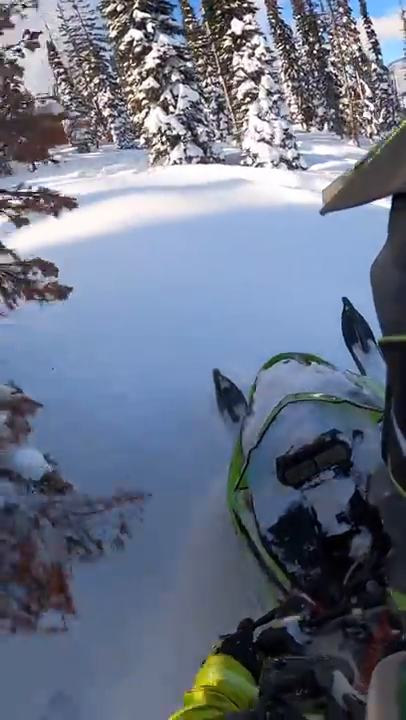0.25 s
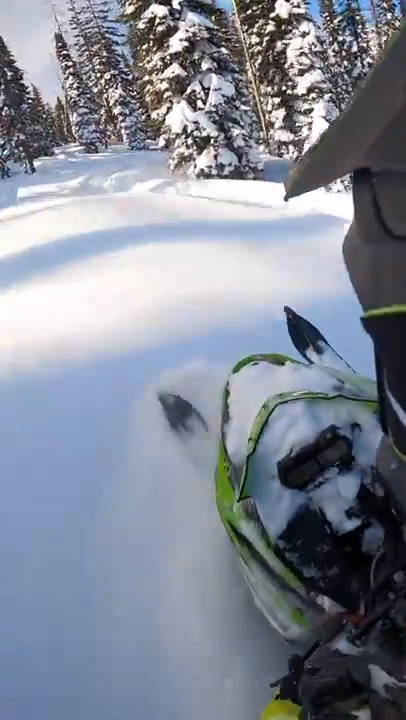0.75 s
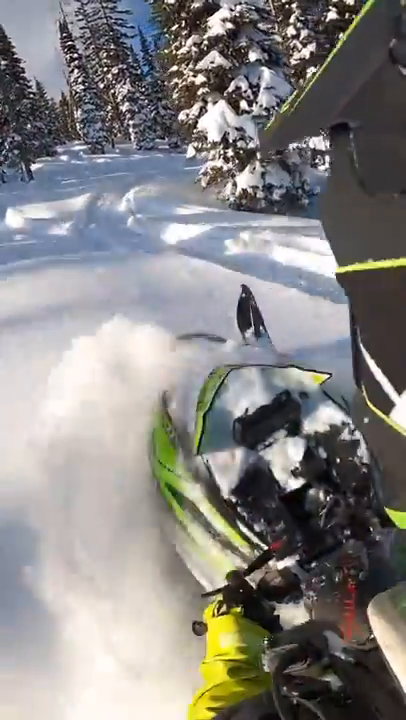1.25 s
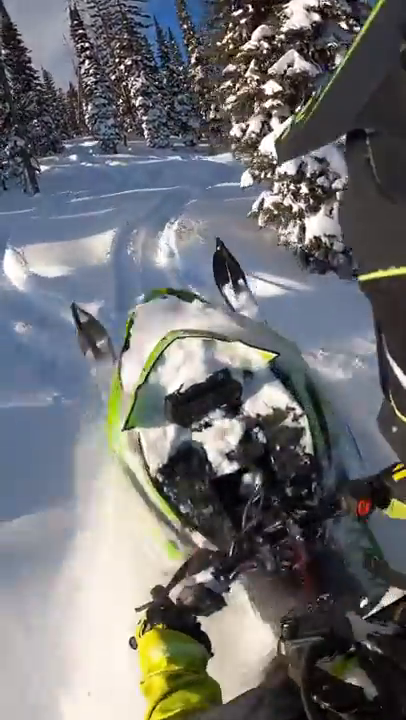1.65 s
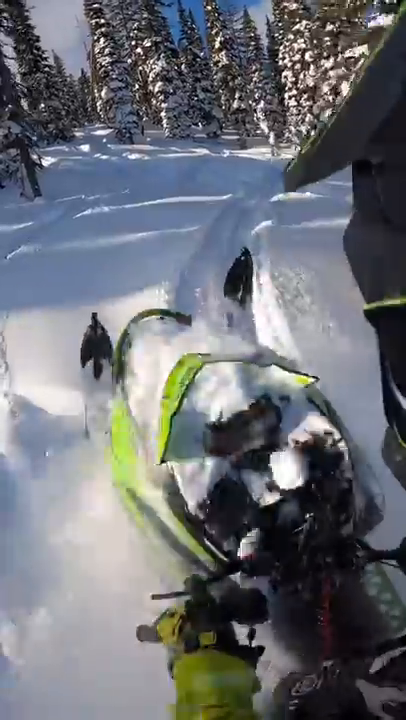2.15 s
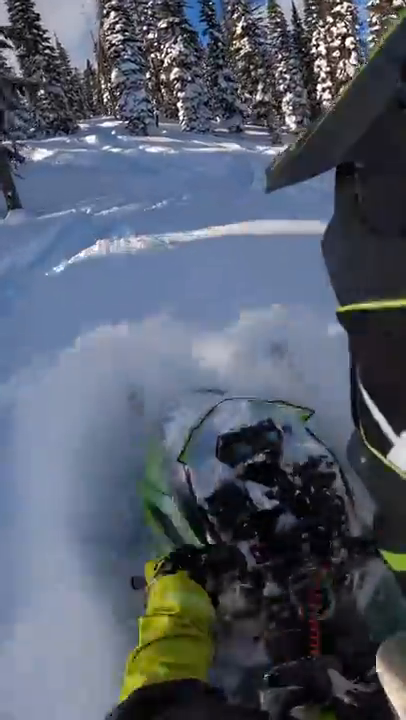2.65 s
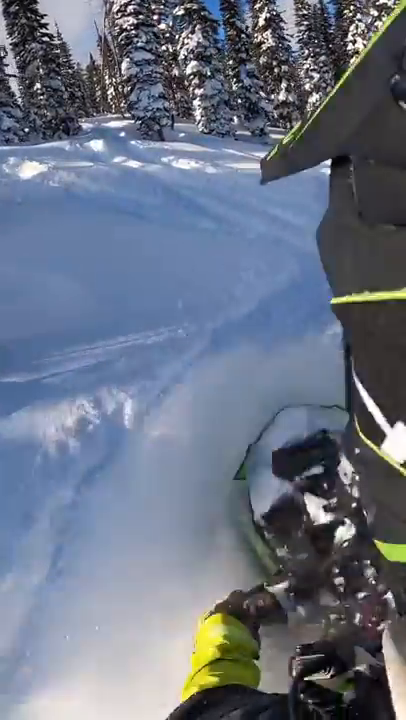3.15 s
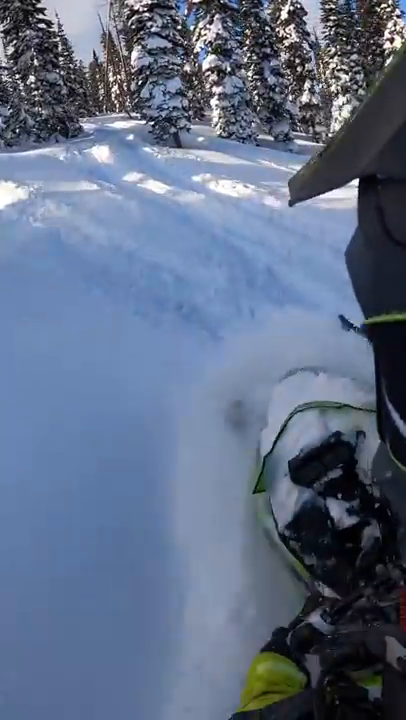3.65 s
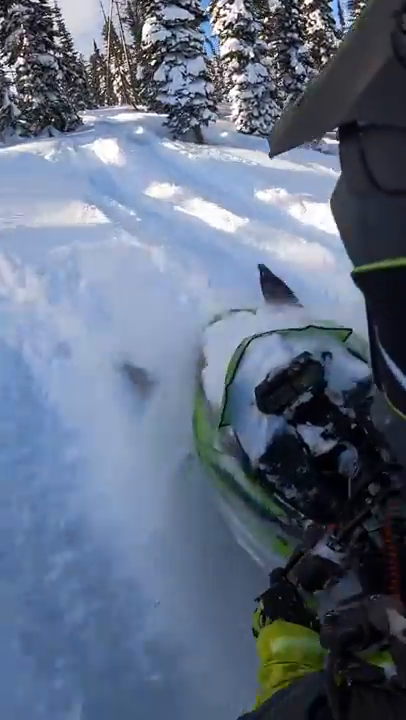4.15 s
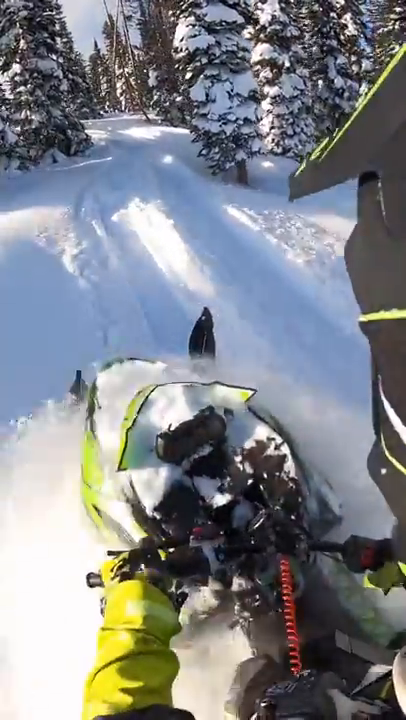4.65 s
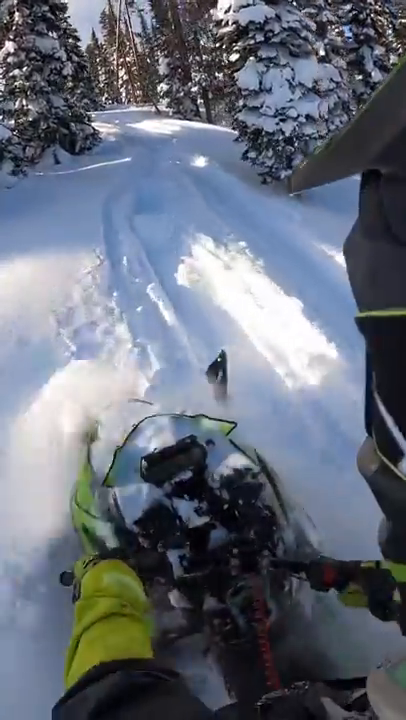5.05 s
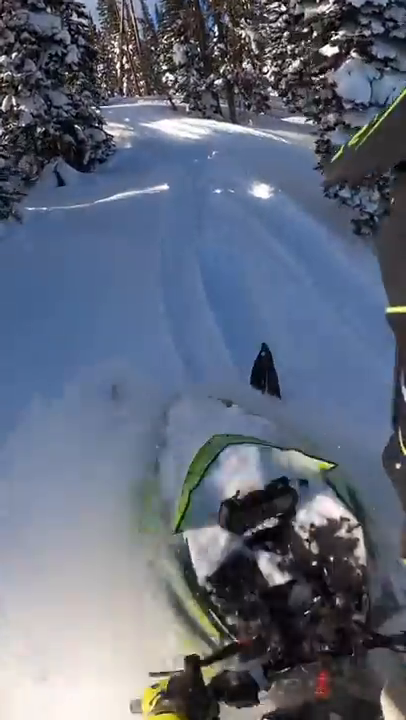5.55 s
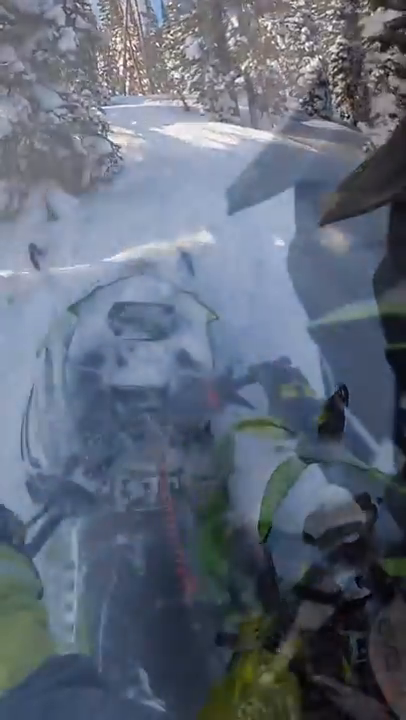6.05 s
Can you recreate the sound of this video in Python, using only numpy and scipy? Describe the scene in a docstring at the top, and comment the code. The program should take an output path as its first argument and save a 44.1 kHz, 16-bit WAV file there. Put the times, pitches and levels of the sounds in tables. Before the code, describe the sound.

Heard from the rider's body, a two-stroke snowmobile surges in quick throttle bursts, its hollow boom and raspy buzz rising and sagging. The track hums unsteadily while wind rumbles and powder churns and sprays. Soft snow waves and dull clods hit mid-ride. The sound cuts abruptly near the end; after a brief silence a soft low engine rattle fades in with tiny ticks.

```python
"""A two-stroke twin snowmobile carves through deep powder, heard from the rider's body.
From the start bursts of throttle make the tuned pipe boom and the firings rasp, as orders of the firing rate
with noisy puffs. The track lugs hum as a wavering tone; wind, churn and spray are shaped noise throughout.
Waves of powder and clods arrive as noise swells and short hits. The ride cuts out abruptly, then after a
silence the engine fades in running slowly: a soft tone, a dull rattle, light ticks and puffs of powder."""
import sys
import numpy as np
from scipy import signal
from scipy.fft import rfft, irfft, next_fast_len
from scipy.io import wavfile
from scipy.ndimage import uniform_filter1d, minimum_filter1d, map_coordinates

SR = 44100
rng = np.random.default_rng(int(sys.argv[2]) if len(sys.argv) > 2 else 0)


def put_to_file(sound):
    """Save the sound as 16-bit audio at rate SR, in the file named by the first command-line argument."""
    columns = np.atleast_2d(sound).T  # one column per channel
    safe = np.clip(columns, -1, 1)
    whole_steps = np.round(safe * 32767)
    wavfile.write(sys.argv[1], SR, whole_steps.astype(np.int16))


N = 277823
T = np.arange(N) / SR


def amp(db):
    """Decibels to gain."""
    return 10 ** (np.asarray(db) / 20)


def unit(x):
    """Scale to rms 1."""
    return x / np.sqrt(np.mean(x ** 2) + 1e-20)


def curves(rows):
    """One value per sample for each column after the time."""
    time_s, *columns = np.transpose(rows)
    return [np.interp(T, time_s, column) for column in columns]


def wobble(rate):
    """A smooth random curve with rate knots a second."""
    knots = rng.standard_normal(int(N * rate / SR) + 4)
    coarse_s = T[::16]
    return np.interp(T, coarse_s, map_coordinates(knots, [coarse_s * rate]))


def bump(centre_s, half_length_s):
    """A soft rise and fall of height 1, down to 1/e one half length from its centre."""
    return np.exp(-((T - centre_s) / half_length_s) ** 2)


def glide(start_s, end_s, skew):
    """An S-shaped move from 0 to 1 between two times; a skew under 1 moves sooner."""
    progress = np.clip((T - start_s) / (end_s - start_s), 0, 1)
    return np.sin(np.pi / 2 * progress ** skew) ** 2


def filtered(x, response):
    """Multiply the spectrum of x by a function of frequency in Hz."""
    size = next_fast_len(N + SR // 2)
    hz = np.fft.rfftfreq(size, 1 / SR)
    return irfft(rfft(x, size) * response(hz), size)[:N]


def coloured(x, spectrum):
    """Equalise x by (pitch_hz, level_db) points on a log frequency axis, then scale to rms 1."""
    pitch_hz, level_db = np.transpose(spectrum)

    def response(hz):
        return amp(np.interp(np.log(hz + 1), np.log(pitch_hz), level_db, left=-80, right=-100))
    return unit(filtered(x, response))


def noise(patchy_db):
    """White noise with patches of random gain in time and frequency."""
    grains = signal.stft(rng.standard_normal(N), nperseg=512)[2]
    patches = uniform_filter1d(rng.standard_normal(grains.shape), size=9, axis=0)
    patches = unit(uniform_filter1d(patches, size=7, axis=1))
    return signal.istft(grains * amp(patchy_db * patches), nperseg=512)[1][:N]


def turning(hz):
    """Phase in radians of something that repeats hz times a second."""
    return 2 * np.pi * np.cumsum(hz) / SR


def tone(phase):
    """A sine of rms 1 with a random start."""
    return np.sqrt(2) * np.cos(phase + rng.uniform(0, 2 * np.pi))


def per_firing(phase):
    """A new random value for each firing, smoothly joined."""
    return map_coordinates(rng.standard_normal(N // 64), [phase / (2 * np.pi)])


def swells(rows, spectrum):
    """Soft rushes of snow that rise and fall."""
    envelope = sum(amp(level_db) * bump(centre_s, half_length_s) for centre_s, half_length_s, level_db in rows)
    return envelope * coloured(rng.standard_normal(N), spectrum)


def knocks(rows, spectrum, t60):
    """Unpitched noise hits whose envelopes fall by 60 dB in t60 seconds."""
    envelope = sum(amp(level_db - 60 * np.abs(T - start_s) / t60) * (T >= start_s)
                   for start_s, level_db in rows)
    hits = envelope * rng.standard_normal(N)
    return np.std(hits) * coloured(hits, spectrum)


THROTTLE_S, THUMB_LEAD_S = 0.069, 0.013  # time the throttle takes to move; its lead on the revs


def eased(x):
    """Smooth x over the time that the throttle takes to move."""
    return uniform_filter1d(x, size=max(1, int(THROTTLE_S * SR)))


FULL_HZ, LOAD_SPAN_HZ = 275.2, 31.7  # the engine stops pulling over this span below full revs


def headroom(firing_hz):
    """1 while the engine can still speed up, 0 at full revs."""
    return np.clip((FULL_HZ - firing_hz) / LOAD_SPAN_HZ, 0, 1)


# Bursts of throttle: start_s, low_hz and top_hz (firings per second), rise_s and hold_s, in the order
# start_s, low_hz, rise_s, top_hz, hold_s, then boom_db (added to the pipe's level), octave_db,
# octave_loss_db (at full revs), third_db, rasp_open_db, rasp_run_down_db, added_roughness (0-1)
THROTTLE_BURSTS = [(-.2, 239, 0.22, 260.6, 0.041, 0, -21, 7.5, -27.5, -29.5, -31, 0.03),
                   (.246, 233.3, 0.27, 254, 0.055, 1.5, -21, 8, -29.5, -30.5, -34, 0.04),
                   (.755, 223.7, 0.41, 269.7, 0.49, 1.5, -22.5, 15.5, -31, -29, -27, 0.02),
                   (1.824, 212.9, 0.34, 266.5, 0.28, -2.5, -22, 6.5, -34.5, -29, -33.5, .03),
                   (2.717, 185.7, 0.2, 217.1, 0, -5.5, -28.5, 0, -36, -31, -33.5, .08),
                   (3.13, 169.1, 0.19, 208.6, 0.0036, -11, -31, 0, -41, -33.5, -32.5, 0.22),
                   (3.488, 168.3, .213, 204, .033, -1, -24.5, 0, -40, -34.5, -33.5, .08),
                   (3.8, 177.9, 0.4, 258.8, 0.018, -1, -24, 12, -34.5, -30, -30.5, 0),
                   (4.57, 163.6, 0.21, 210.2, 0.004, -1.5, -22.5, 0, -30, -29.5, -26.5, 0.01),
                   (4.972, 173.5, 0.23, 225, 0.021, -0.5, -27, 0, -31.5, -27.5, -27.5, 0.01)]
COAST_S, COAST_HZ = 5.615, 142.2  # the last run-down ends here
CREEP_HZ_PER_S = 9  # the revs still creep up while the throttle is held
RISE_SKEW, FALL_SKEW = .865, .766
LOAD_BUILD_S = 0.11  # the clutch takes up the load over this time


def drive():
    """Firing rate, throttle and load (0-1): each burst winds the engine up, holds it and lets it run down."""
    firing_hz = np.full(N, float(THROTTLE_BURSTS[0][1]))
    is_open, grip = np.zeros(N), np.zeros(N)
    troughs = [row[:2] for row in THROTTLE_BURSTS[1:]] + [(COAST_S, COAST_HZ)]
    for burst, (next_s, next_hz) in zip(THROTTLE_BURSTS, troughs):
        start_s, low_hz, rise_s, top_hz, hold_s = burst[:5]
        shut_s = start_s + rise_s + hold_s
        firing_hz += (top_hz - low_hz) * glide(start_s, start_s + rise_s, RISE_SKEW)
        firing_hz += CREEP_HZ_PER_S * np.clip(T - start_s - rise_s, 0, hold_s)
        firing_hz += (next_hz - firing_hz) * glide(shut_s, next_s, FALL_SKEW)
        is_open += (T >= start_s - THUMB_LEAD_S) & (T < shut_s)
        grip += np.clip((T - start_s) / LOAD_BUILD_S, 0, 1) * (T < shut_s)
    return firing_hz, eased(is_open), eased(grip) * headroom(firing_hz)


def burst_levels():
    """The level columns of the bursts, each kept until the next burst and eased across."""
    start_s, _, _, _, _, *levels = np.transpose(THROTTLE_BURSTS)
    current = np.searchsorted(start_s[1:], T)
    return [eased(level[current]) for level in levels]


WAVER_DB = 5  # swing of each low order per unit of roughness


def exhaust(phase, rough, first_db, second_db, third_db):
    """The tuned pipe booms on the lowest orders, which waver when it runs rough; unlike cylinders add half orders."""
    boom = amp(first_db) * (tone(phase) + amp(-24) * tone(phase / 2) + amp(-19) * tone(1.5 * phase))
    orders = [boom, amp(second_db) * tone(2 * phase), amp(third_db) * tone(3 * phase)]
    wavering = sum(order * amp(WAVER_DB * rough * wobble(25)) for order in orders)
    return wavering * amp(2.0 * rough * per_firing(phase))


# Narrow resonances of the hood and intake: pitch_hz, half_width_hz, gain_db
HOOD_WHINES = [(1075, 20, 3), (1630, 35, 3.5), (2184, 70, 5), (2840, 60, 5)]


def overtones(phase, half_order_db, shimmer_db):
    """A buzzing series of crank orders; fixed reflections under the hood make each swell as its pitch slides."""
    orders = [k for k in range(5, 64) if k != 6]  # the exhaust plays order 6
    buzz = sum(amp(half_order_db * (k % 2) + shimmer_db * wobble(6)) * tone(k * phase / 2) for k in orders)
    # one panel answers clearly, several others weakly: (delay_s, gain)
    echoes = [(.00277, .35)] + [(rng.uniform(.004, .014), .2) for _ in range(6)]

    def hood(hz):
        comb = 1 + sum(gain * np.exp(-2j * np.pi * hz * delay_s) for delay_s, gain in echoes)
        whine_db = sum(gain_db / (1 + ((hz - pitch_hz) / half_width_hz) ** 2)
                       for pitch_hz, half_width_hz, gain_db in HOOD_WHINES)
        return comb * amp(whine_db)
    return filtered(buzz, hood)


HALF_ORDER_DB, HALF_ORDER_ROUGH_DB = -5.5, 3  # the cylinders differ more when the engine runs rough


def firings(phase, rough, buzz_spectrum, puff_spectrum):
    """Each firing buzzes and lets out a puff of turbulent gas; rough is the puffs' share of the power."""
    buzz = overtones(phase, half_order_db=HALF_ORDER_DB + HALF_ORDER_ROUGH_DB * rough, shimmer_db=1.5)
    puffs = noise(patchy_db=3.46) * amp(3.2 * np.cos(phase) + 1.7 * np.cos(phase / 2))
    return np.sqrt(1 - rough) * coloured(buzz, buzz_spectrum) + np.sqrt(rough) * coloured(puffs, puff_spectrum)


# Tone colours of the buzz through the hood, of the exhaust's gas puffs and of the intake:
# pitch_hz, level_db (relative, per Hz)
HOOD_COLOUR = [(250, -15.5), (450, 12), (600, -2), (820, -7), (920, -2.5), (1080, -0.5), (1250, 9.5),
               (1450, -5), (1700, -11), (2500, -31.5), (5000, -47)]
RASP_COLOUR = [(300, -23.5), (550, -0.5), (720, -2.5), (880, -3.5), (1200, 3), (1500, -3.5), (2000, -13),
               (3300, -30), (6000, -49)]
INTAKE_COLOUR = [(1200, -27.5), (1550, 4.5), (1800, 2), (2000, 0), (2200, -2), (2450, -5), (2900, -5.5),
                 (3400, -8), (4200, -11), (5500, -21.5), (8000, -32.5)]


def rasp(phase, rough, rasp_db, snarl_db):
    """The exhaust rasps through the hood and the intake snarls above it, uneven from firing to firing."""
    uneven = amp(2.4 * rough * per_firing(phase))
    body = unit(firings(phase, rough, HOOD_COLOUR, RASP_COLOUR) * uneven)
    snarl = unit(firings(phase, rough, INTAKE_COLOUR, INTAKE_COLOUR) * uneven)
    return amp(rasp_db) * body + amp(snarl_db) * snarl


# Boom of the tuned pipe: firing_hz (firings per second), level_db (before the burst's boom_db and the cuts)
PIPE_BOOM = [(142, -15), (156, -14), (174, -23), (200, -18.5), (230, -14.5), (255, -12), (269, -10),
             (274, -13)]
# Combustion smooths out with the revs: firing_hz (firings per second), roughness (0-1, before additions)
REV_ROUGHNESS = [(165, .5), (220, .2), (270, .11)]
SHUT_ROUGHNESS = .3  # added with the throttle shut
FLUTTER, FLUTTER_PER_S = .035, 70  # swing of crank speed per squared roughness, and its pace
BOG_DB, BOG_S, BOG_LEAD_S = 3, 0.068, .01  # the boom sinks around each opening: depth, half length, lead
BOOM_SHUT_DB, OCTAVE_SHUT_DB, THIRD_SHUT_DB = 1, 9, 6  # losses with the throttle shut
RASP_LOAD_DB = 3  # the rasp gains with load
SNARL_DB, SNARL_OPEN_DB, SNARL_LOAD_DB = -5, 0.5, 2.5  # snarl against rasp; gains with throttle and load


def engine(firing_hz, throttle, load):
    """Revs, throttle and load shape the levels; with the throttle shut it sputters and the crank flutters more."""
    boom_db, octave_db, octave_loss_db, third_db, open_db, run_down_db, added_rough = burst_levels()
    shut = 1 - throttle
    rough = np.interp(firing_hz, *np.transpose(REV_ROUGHNESS)) + SHUT_ROUGHNESS * shut + added_rough
    rough = np.clip(rough, 0, .8)
    phase = turning(firing_hz * (1 + FLUTTER * rough ** 2 * wobble(FLUTTER_PER_S)))
    bog = sum(bump(start_s - BOG_LEAD_S, BOG_S) for start_s, *_ in THROTTLE_BURSTS)
    pipe_db = np.interp(firing_hz, *np.transpose(PIPE_BOOM))
    first_db = boom_db + pipe_db - BOG_DB * bog - BOOM_SHUT_DB * shut
    second_db = octave_db - OCTAVE_SHUT_DB * shut - octave_loss_db * throttle * (1 - headroom(firing_hz))
    rasp_db = open_db * throttle + run_down_db * shut + RASP_LOAD_DB * load
    snarl_db = rasp_db + SNARL_DB + SNARL_OPEN_DB * throttle + SNARL_LOAD_DB * load
    pipe = exhaust(phase, rough, first_db, second_db, third_db - THIRD_SHUT_DB * shut)
    return pipe + rasp(phase, rough, rasp_db, snarl_db)


# Track hum: time_s, lug_hz (lugs per second, before flutter), level_db (of the main tone, before waver)
TRACK_HUM = [(0, 171.8, -30), (.45, 179.5, -26), (.78, 155.1, -25), (1.17, 192, -27.5), (1.4, 195.5, -21),
             (1.68, 210.7, -25.5), (1.85, 195.2, -35), (2.6, 165, -45.5), (3.9, 150.5, -39.5),
             (4.25, 169.5, -22), (4.5, 149.9, -44.5), (5.3, 158, -29)]


def track():
    """The lugs of the rubber track drum over the drive wheels; every other lug differs."""
    lug_hz, hum_db = curves(TRACK_HUM)
    phase = turning(lug_hz * (1 + 0.0089 * wobble(25)))
    hum = tone(phase) + amp(-8.5) * tone(phase / 2)
    return amp(hum_db + 2.7 * wobble(17)) * hum


# Wind and churning snow: time_s, buffet_db, churn_db (both before their trims)
WIND_AND_CHURN = [(0, -29.5, -29.5), (.54, -28, -24.5), (1.05, -34, -29.5), (1.7, -32.5, -28.5),
                  (1.82, -25.5, -28.5), (1.9, -31, -26.5), (2.26, -24, -21.5), (2.38, -39.5, -28.5),
                  (2.6, -20, -24), (2.85, -22, -24), (3.3, -19, -24.5), (3.78, -22.5, -26.5),
                  (3.92, -28.5, -32), (4.31, -34, -40), (4.39, -23, -24.5), (4.65, -25.5, -28.5),
                  (5.05, -24.5, -25), (5.6, -24.5, -30)]
BUFFET_TRIM_DB, CHURN_TRIM_DB = -0.5, 4
# Tone colours of the wind and of the churn: pitch_hz, level_db (relative, per Hz)
BUFFET_COLOUR = [(15, -14.5), (30, 1), (60, 2.5), (100, 3), (160, -17.5), (300, -29), (800, -58.5)]
CHURN_COLOUR = [(50, -16), (110, 3.5), (180, 4.5), (300, 3), (480, -4.5), (620, -10), (900, -11.5),
                (2000, -28)]


def wind_and_churn():
    """Wind buffets the microphone as slow low noise; powder churns under the sled as faster-swinging noise."""
    buffet_db, churn_db = curves(WIND_AND_CHURN)
    buffet = unit(coloured(noise(patchy_db=.5), BUFFET_COLOUR) * amp(wobble(25)))
    churn = unit(coloured(noise(patchy_db=1.2), CHURN_COLOUR) * amp(wobble(60)))
    return amp(buffet_db + BUFFET_TRIM_DB) * buffet + amp(churn_db + CHURN_TRIM_DB) * churn


# Finest powder hiss: time_s, level_db (before the trim and dips)
POWDER_HISS = [(0, -56), (.85, -54.5), (1.1, -55), (1.65, -54.5), (2.05, -58), (2.3, -66.5), (3.25, -61.5),
               (3.65, -59), (4.4, -58.5), (5.3, -58), (5.6, -58.5)]
FIZZ_TRIM_DB = -1.5
# The hiss dips briefly: centre_s, half_length_s, depth_db
BRIEF_DIPS = [(2.91, 0.025, 6), (3.115, 0.024, 21), (3.45, 0.056, 10)]
# Tone colours of the coarser spray and of the finest powder: pitch_hz, level_db (relative, per Hz)
SPRAY_COLOUR = [(1200, -29), (2600, -3.5), (3800, -7), (5000, -10.5), (6300, -19), (8000, -29),
                (11000, -42)]
FIZZ_COLOUR = [(5000, -14), (8000, 0.5), (10500, 2.5), (13000, -9), (15500, -22)]
# coarser spray: level, change with load, share of the powder's swings
SPRAY_DB, SPRAY_LOAD_DB, SPRAY_FOLLOWS = -39.5, -0.5, 0.21


def spraying(load):
    """Powder sprays over the hood: coarse grains and a fine fizz, both patchy noise, dip and waver together."""
    powder_db, = curves(POWDER_HISS)
    spray_db = SPRAY_DB + SPRAY_LOAD_DB * load + SPRAY_FOLLOWS * (powder_db - powder_db.mean())
    dip_db = sum(depth_db * bump(centre_s, half_length_s) for centre_s, half_length_s, depth_db in BRIEF_DIPS)
    spray = unit(coloured(noise(patchy_db=2.0), SPRAY_COLOUR) * amp(1.1 * wobble(300)))
    fizz = coloured(noise(patchy_db=1.0), FIZZ_COLOUR)
    hiss = amp(spray_db) * spray + amp(powder_db + FIZZ_TRIM_DB) * fizz
    return hiss * amp(.8 * wobble(20) - dip_db)


# Waves of powder: centre_s, half_length_s, level_db (rms at the crest)
POWDER_WAVES = [(1.73, 0.06, -37), (2.85, 0.039, -32), (3.41, 0.09, -25.5), (5.12, 0.098, -30)]


def powder_waves():
    """Waves of powder wash over the hood as soft swells of midrange noise."""
    return swells(POWDER_WAVES, [(250, -3.5), (500, 0.5), (850, -1.0), (1500, -8), (3000, -31.5)])


# Snow clods: start_s, level_db (of the strike before colouring)
SNOW_CLODS = [(2.712, -22), (3.088, -13), (3.376, -17), (3.785, -22)]


def clods():
    """Snow clods strike the rider as dull, fast-dying noise hits."""
    return knocks(SNOW_CLODS, [(80, -6), (400, 0), (900, -4), (1500, -10), (4000, -32)], t60=.06)


# Slow running: time_s, firing_hz (firings per second, before flutter), tone_db (before waver), rattle_db
SLOW_RUNNING = [(5.86, 126, -39, -44), (5.95, 126.7, -35.5, -40.5), (6.04, 121.8, -34, -32.5),
                (6.09, 122.5, -30.5, -35), (6.15, 122.7, -28, -32), (6.21, 115, -29, -32),
                (6.25, 128.2, -38, -26.5), (6.3, 126, -21, -31)]
# Tone colour of the rattle: pitch_hz, level_db (relative, per Hz)
RATTLE_COLOUR = [(30, -8), (80, -11.5), (130, 0), (220, -16), (310, -13), (370, -25), (450, -12),
                 (560, -26.5), (900, -27.5), (1200, -25), (1700, -36.5), (4800, -49.5), (6200, -60),
                 (8000, -66), (14000, -80)]


def slow_engine():
    """At low revs a soft firing tone sounds with a dull rattle, noise that pulses at each firing."""
    firing_hz, tone_db, rattle_db = curves(SLOW_RUNNING)
    phase = turning(firing_hz * (1 + .012 * wobble(50)))
    hum = amp(tone_db + 0.71 * per_firing(phase)) * tone(phase)
    pulsing = coloured(rng.standard_normal(N), RATTLE_COLOUR) * amp(2 * np.cos(phase))
    return hum + amp(rattle_db) * unit(pulsing)


# Light ticks: start_s, level_db (before colouring and trim)
LIGHT_TICKS = [(5.899, -45), (5.9334, -40), (6.0277, -40), (6.0916, -38), (6.125, -38)]


def ticks():
    """Light ticks: very short noise hits, brightest around 2.4 kHz."""
    return amp(-6.5) * knocks(LIGHT_TICKS, [(1200, -13), (1900, -2), (2400, 5), (3200, -25)], t60=0.017)


# Puffs of powder: centre_s, half_length_s, level_db (rms at the crest, before the fade-in)
POWDER_PUFFS = [(6.053, 0.015, -58), (6.252, .02, -52.5)]


def powder_puffs():
    """Puffs of powder: brief swells of bright noise."""
    return swells(POWDER_PUFFS, [(2000, -6), (4800, 4), (6500, -14), (8000, -25)])


CUT_S, RETURN_S = 5.663, 5.83  # the ride is gone; the slow engine starts to fade in


def scene():
    """The ride cuts out; after a silence the slow engine fades in."""
    firing_hz, throttle, load = drive()
    snow = wind_and_churn() + spraying(load) + powder_waves() + clods()
    ride = engine(firing_hz, throttle, load) + track() + snow
    crawl = slow_engine() + ticks() + powder_puffs()
    cut = np.clip((CUT_S - T) / .001, 0, 1)
    fade = np.clip((T - RETURN_S) / 0.072, 0, 1) ** 2
    return (ride * cut + crawl * fade)[None]


TOP_HZ = 15500  # nothing is kept from here up


def record(dry):
    """A limiter holds down the loudest peaks with a smoothed gain, then a steep cut limits the band."""
    needed = np.minimum(1, .69 / (np.abs(dry[0]) + 1e-9))
    gain = uniform_filter1d(minimum_filter1d(needed, size=900), size=900)
    return filtered(dry[0] * gain, lambda hz: hz < TOP_HZ)[None]


dry = scene()
out = record(dry)
put_to_file(out)
```